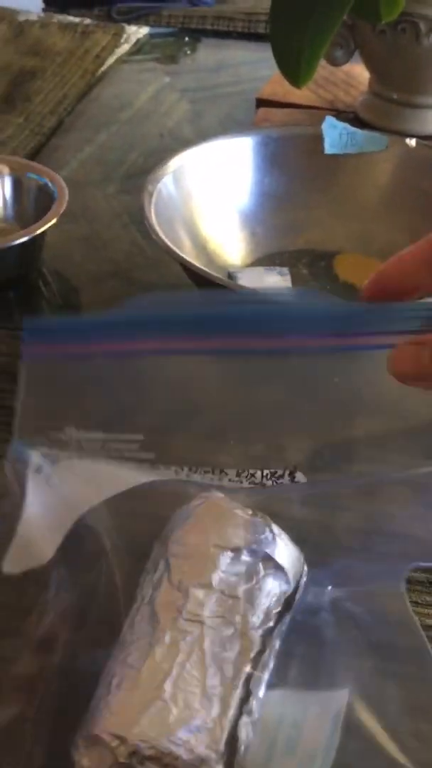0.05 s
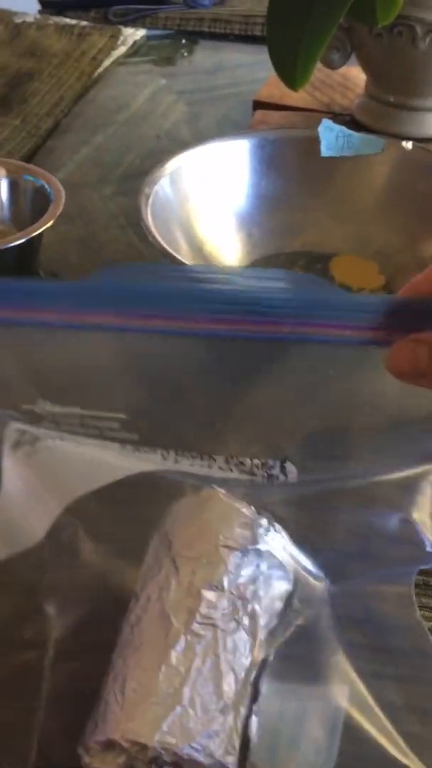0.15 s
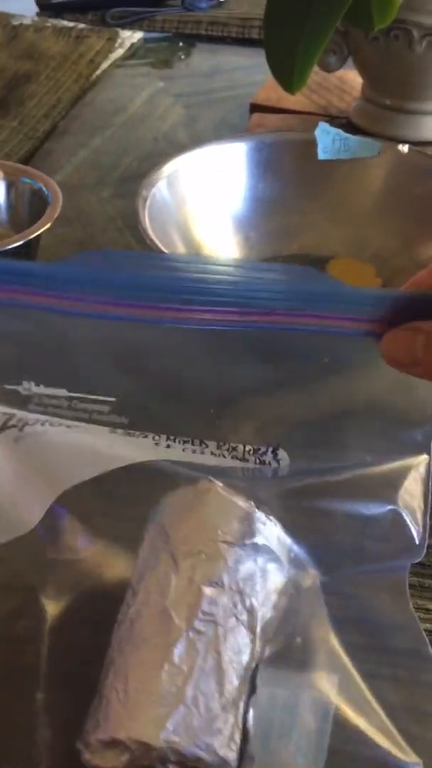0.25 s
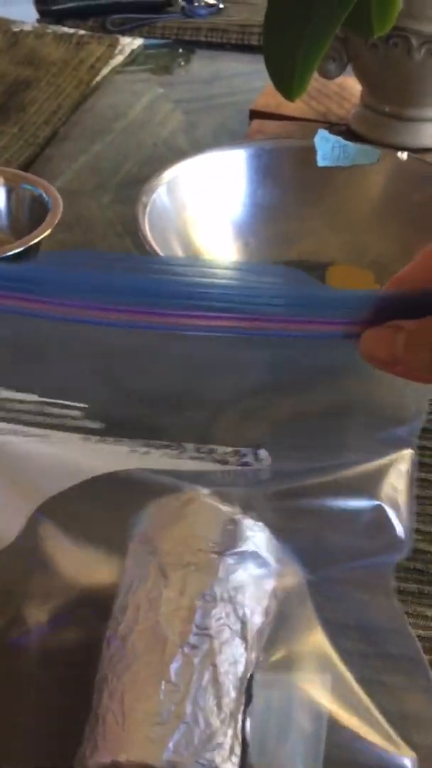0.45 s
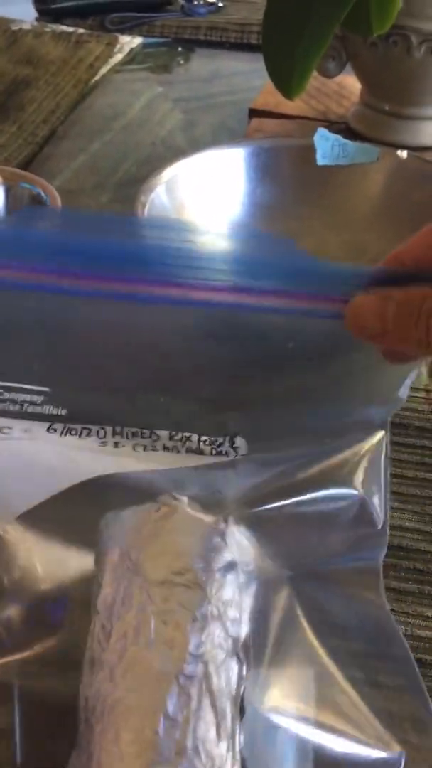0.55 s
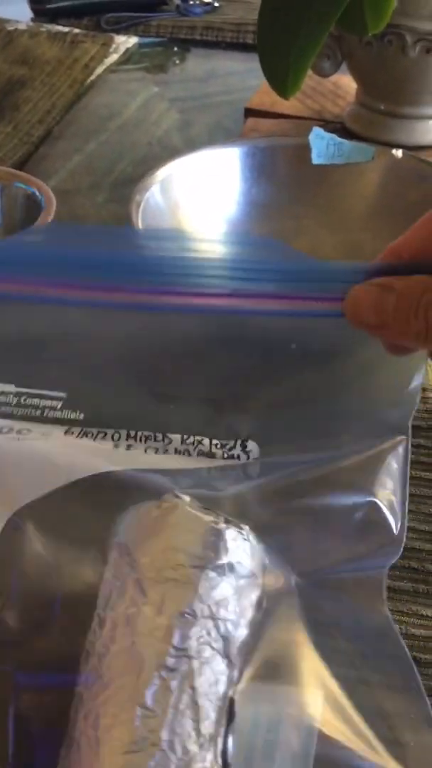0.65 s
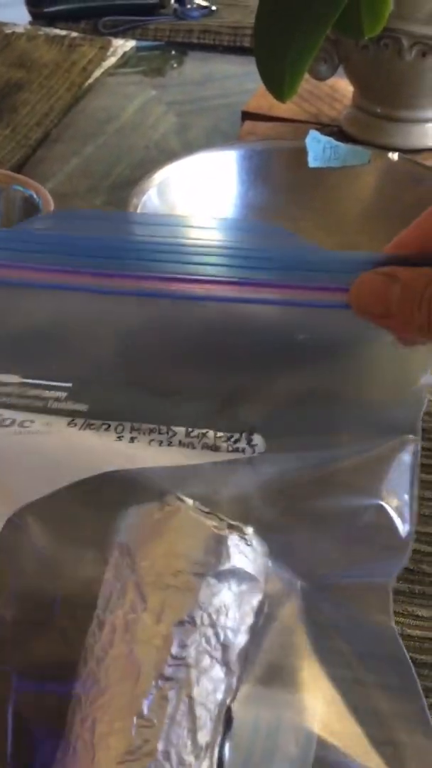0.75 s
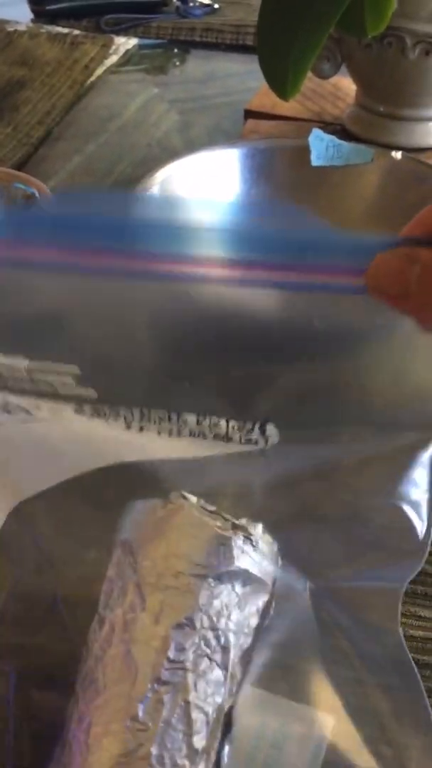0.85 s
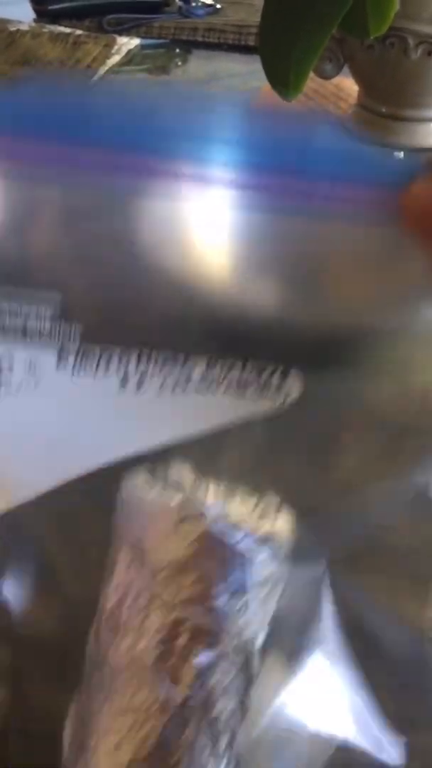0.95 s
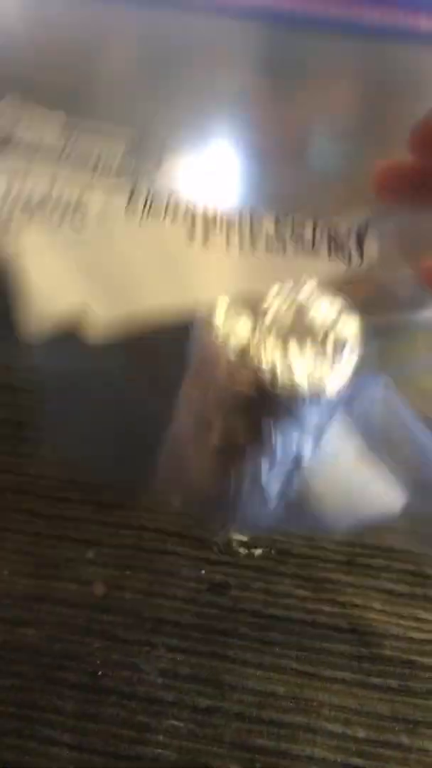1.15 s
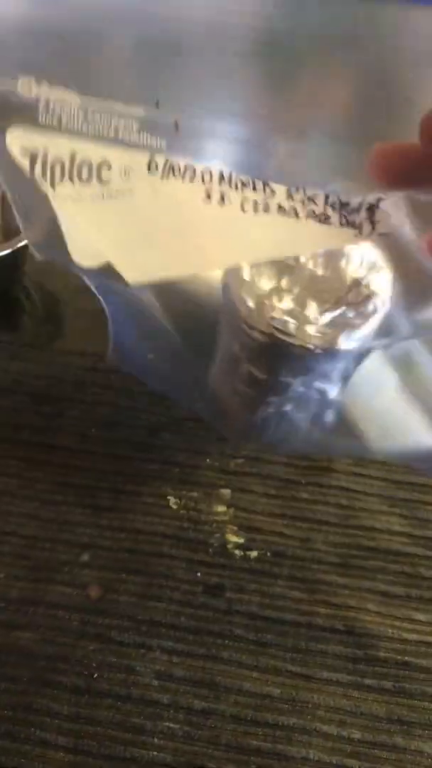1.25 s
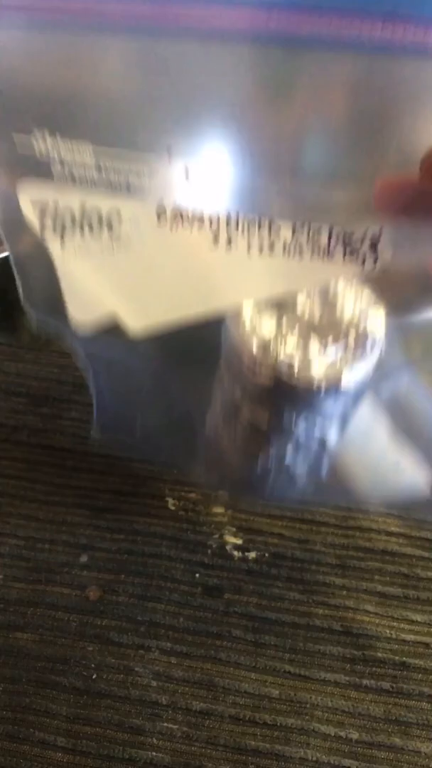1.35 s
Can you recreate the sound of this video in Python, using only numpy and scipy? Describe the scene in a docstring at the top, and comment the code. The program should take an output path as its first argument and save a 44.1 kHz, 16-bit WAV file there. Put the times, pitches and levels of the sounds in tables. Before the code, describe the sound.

A plastic freezer bag crinkles as fingers snap its zip seal shut.

```python
"""Fingers press the zip seal of a plastic freezer bag shut, close by in a small kitchen.
Over a low room hum, the film first ticks as creases flip, bumps softly and rustles with friction.
At about 0.2 s the ridge of the seal snaps into its groove three times, ringing the strip's modes.
Then the bag is shifted and lifted: more ticks, rustles and dull bumps, thickest around one second."""
import sys
import numpy as np
from scipy import signal
from scipy.fft import rfft, irfft, next_fast_len
from scipy.io import wavfile

SR = 44100
rng = np.random.default_rng(int(sys.argv[2]) if len(sys.argv) > 2 else 0)


def unload_audio(sound):
    """Save the sound as a 16-bit wav file, at the path given as the first command line argument."""
    columns = np.transpose(np.atleast_2d(sound))
    # keep every value between -1 and 1, then stretch to whole-number steps
    steps = np.round(np.clip(columns, -1, 1) * 32767)
    wavfile.write(sys.argv[1], SR, steps.astype(np.int16))


N = 61739
T = np.arange(N) / SR

# Spectrum of the room noise. Each row: frequency in Hz, relative level in dB.
ROOM_NOISE_SPECTRUM = [(15, -23.5), (25, -16), (80, -1.5), (108, -12), (149, -5), (212, -7.5), (301, -10),
                       (335, -13), (451, -18.5), (695, -29.5), (1260, -27), (1560, -31), (5280, -38.5),
                       (16000, -49.5)]
# Creases flipping. Each row: start in seconds, level in dB, pitch in Hz, relative edge level in dB.
CREASE_FLIPS = [(0.0045, -20, 1220, -23.5), (0.111, -34, 2220, -5), (0.1691, -25.5, 4070, -21),
                (0.1698, -22.5, 1510, -30), (0.2885, -27.5, 2520, -34), (0.499, -14.5, 1700, -26.5),
                (0.5005, -14.5, 815, -51), (0.5662, -17, 1050, -35), (0.567, -28.5, 2400, -43),
                (0.7333, -38, 1586, -22.5), (0.7933, -19.5, 1296, -33), (0.8374, -24.5, 1260, -37),
                (0.8525, -29, 1900, -31), (0.8721, -22.5, 3380, -20), (0.8723, -19, 1330, -31),
                (0.8955, -18.5, 2960, -37), (0.8995, -13.5, 1370, -21.5), (0.906, -25, 2000, -34),
                (0.9168, -23, 2190, -28), (0.9419, -13, 2150, -27), (0.9599, -28.5, 3000, -1.5),
                (1.0816, -21, 1610, -29), (1.095, -9, 1390, -31), (1.1052, -23.5, 4200, -17.5),
                (1.1141, -15.5, 1600, -30), (1.1433, -19, 1440, -26), (1.1554, -24.5, 4070, -11.5),
                (1.2706, -12, 1400, -44), (1.2703, -22.5, 3120, -26), (1.3006, -20, 1240, -33),
                (1.3306, -30, 5350, -22), (1.3396, -14, 860, -15.5), (1.3853, -15.5, 990, -38.5),
                (1.3849, -24.5, 2700, -19)]
# The bag flexing. Each row: centre in seconds, length in seconds, level in dB, pitch in Hz.
HAND_BUMPS = [(0.005, 0.037, -51.5, 236), (0.898, 0.041, -49, 206), (0.948, 0.02, -45.5, 154),
              (1.128, 0.056, -47.5, 220), (1.108, 0.14, -54, 81), (1.364, 0.056, -52, 213),
              (1.372, 0.064, -51, 54)]
# Spectrum of rubbed film. Each row: frequency in Hz, relative level in dB.
FILM_SPECTRUM = [(150, -27.5), (400, 9), (750, 9), (1700, 0), (3000, -5.5), (6000, -14), (9000, -20),
                 (15500, -29.5)]
# Film sliding over film and fingers. Each row: loudest moment in seconds, 20 dB rise and fall times
# in seconds, level in dB, tilt above the ringing pitch in dB per octave, ringing pitch in Hz.
FILM_SLIDES = [(0.026, 0.063, .05, -43, 1, 994), (0.108, 0.048, 0.035, -51.5, 4.5, 1910),
               (0.5, 0.013, 0.03, -47.5, 5, 820), (0.592, 0.027, 0.041, -63.5, 5.5, 1500),
               (0.906, 0.061, 0.033, -41.5, 3.5, 740), (0.938, 0.0098, 0.038, -42.5, 4, 1020),
               (0.962, 0.019, 0.061, -44.5, 5.5, 1160), (1.03, 0.018, 0.031, -49.5, 3.5, 694),
               (1.076, .006, 0.078, -45.5, -3.5, 5920), (1.099, 0.032, 0.049, -41, 1, 1410),
               (1.159, 0.099, 0.24, -57.5, 3.5, 594), (1.34, 0.0043, 0.012, -35.5, 3, 900),
               (1.364, 0.036, 0.39, -53, 3, 920)]
# The seal closing. Each row: start in seconds, level in dB, lower edge in Hz, emphasised pitch in Hz,
# then the relative levels in dB of that emphasis, of the film's shiver and of the rebound.
SEAL_SNAPS = [(0.2065, -0.5, 750, 1440, -3.5, 0, -14), (0.2325, -5.5, 5300, 8100, 4.5, -2, -34),
              (0.2464, -2.5, 3250, 6400, 6, -5, -33)]
# Modes of the seal strip. Each row: frequency in Hz, bandwidth in Hz, gain in dB.
STRIP_MODES = [(750, 340, -12), (1900, 1150, 3.5), (3000, 380, 4.5), (4200, 1180, 6), (6150, 2100, 0),
               (7250, 3500, -1), (9100, 2050, 8.5), (12170, 1500, 5.5)]
# Spectrum of the reverberation. Each row: frequency in Hz, relative level in dB.
REVERB_SPECTRUM = [(200, 0), (1000, 1), (1900, 0), (2600, 1.5), (4000, -5), (6500, -8), (9000, -5),
                   (15000, -7.5)]
# Notches of the microphone port. Each row: frequency in Hz, bandwidth in Hz, gain at the centre in dB.
PORT_NOTCHES = [(2400, 230, -0.5), (4950, 330, -3), (10360, 370, -11)]


def amp(db):
    """Decibels as an amplitude ratio."""
    return 10 ** (np.asarray(db) / 20)


def rms_one(x):
    """Normalisation to an rms of 1."""
    return x / np.sqrt(np.mean(x ** 2) + 1e-20)


def impulse(s):
    """A unit impulse at s seconds."""
    return (np.arange(N) == max(round(s * SR), 0)) + 1e-18


def cut(x, hz, kind, order=2):
    """Butterworth low- or high-pass filtering."""
    return signal.sosfilt(signal.butter(order, min(hz, SR / 2 - 500), kind, fs=SR, output="sos"), x)


def resonate(x, hz, width_hz):
    """A damped resonator with unit peak gain."""
    r = np.exp(-np.pi * width_hz / SR)
    feedback = [1, -2 * r * np.cos(2 * np.pi * hz / SR), r * r]
    return signal.lfilter(np.array([1, 0, -1]) * (1 - r * r) / 2, feedback, x)


def colour(x, db_at):
    """Spectral shaping by a function from octaves (log2 Hz) to dB."""
    size = next_fast_len(N + SR // 10)
    octaves = np.log2(np.maximum(np.arange(size // 2 + 1) * SR / size, 1))
    return irfft(rfft(x, size) * amp(db_at(octaves)), size)[:N]


def curve(points):
    """Interpolation of (Hz, dB) points as a function of octaves."""
    hz, db = np.transpose(points)
    return lambda octaves: np.interp(octaves, np.log2(hz), db)


def bell(x, centre, width):
    """A Gaussian of height 1."""
    return np.exp(-.5 * ((x - centre) / width) ** 2)


def convolve(x, response):
    """Convolution with an impulse response."""
    return signal.fftconvolve(x, response)[:N]


def dying_noise(t60):
    """Exponential decay: noise of unit energy that falls 60 dB in t60 seconds."""
    tail = rng.standard_normal(N) * np.exp(-np.log(1000) * T / t60)
    return tail / np.linalg.norm(tail)


def flutter(t60):
    """Phase scattering: a brief dense shake with a nearly flat spectrum."""
    spectrum = rfft(dying_noise(t60))
    return irfft(spectrum / (np.abs(spectrum) + 1e-12), N) * (T < t60)


def slips(per_s, spread_db=3):
    """A Poisson process: tiny slips of uneven size at random moments."""
    sizes = amp(spread_db * np.minimum(rng.exponential(1, N), 4.5)) * rng.choice([-1, 1], N)
    return sizes * (rng.random(N) < per_s / SR)


def room_hum(noise_db=-54, hum_db=-59.5, hum_hz=76.5):
    """Superposition of steady broadband room noise and the pure tone of an appliance."""
    air = rms_one(colour(rng.standard_normal(N), curve(ROOM_NOISE_SPECTRUM)))
    hum = np.sqrt(2) * np.sin(2 * np.pi * hum_hz * T)
    return amp(noise_db) * air + amp(hum_db) * hum


def creases(shiver_db=9.5, pop_q=2.27):
    """Buckling: each crease flips with a crisp edge and a damped pop, and the film shivers briefly."""
    out = 0
    for start, db, hz, edge_db in CREASE_FLIPS:
        flip = amp(db) * impulse(start)
        shaken = flip + amp(shiver_db) * convolve(flip, flutter(t60=0.01))
        pop = cut(resonate(shaken, hz, hz / pop_q), 1.89 * hz, "low")
        edge = amp(edge_db) * cut(shaken, 13000, "low")
        out = out + pop + edge
    return cut(out, 483, "high")


def bumps(relative_bandwidth=0.56):
    """Heavily damped resonance: the whole bag flexes in the hand with a dull swell of low noise."""
    out = 0
    for centre, length, db, hz in HAND_BUMPS:
        flex = resonate(rng.standard_normal(N), hz, hz * relative_bandwidth)
        out = out + amp(db) * bell(T, centre, length / 2) * rms_one(cut(flex, 2 * hz, "low"))
    return out


def rustle(crackle_db=-67, ring_db=5.5, ring_octaves=0.17, bass_loss_db_per_octave=5):
    """Stick-slip friction: each slide is a swell of tiny slips, coloured by the panel that moves."""
    film = curve(FILM_SPECTRUM)
    out = amp(crackle_db) * rms_one(colour(slips(per_s=770), film))  # held film crackles throughout
    for peak, rise, fall, db, tilt_db, hz in FILM_SLIDES:
        def panel(octaves):
            """Panel resonance: a peak on the film's spectrum, with a slope on either side."""
            above = octaves - np.log2(hz)
            slopes = tilt_db * np.maximum(above, 0) - bass_loss_db_per_octave * np.maximum(-above, 0)
            return film(octaves) + slopes + ring_db * bell(above, 0, ring_octaves)

        swell = amp(db - 20 * np.maximum((peak - T) / rise, (T - peak) / fall))
        friction = colour(slips(per_s=5000), panel)
        out = out + swell * rms_one(cut(friction, 220, "high"))
    return out


def seal_snaps(rebound_s=0.00053, thud_db=-18.5):
    """Modal ringing: the ridge drops into its groove and rebounds; a shorter stretch sounds higher."""
    out = 0
    for start, db, edge_hz, emphasis_hz, emphasis_db, shiver_db, rebound_db in SEAL_SNAPS:
        push = amp(db) * (impulse(start) + amp(rebound_db) * impulse(start + rebound_s))
        modes = sum(amp(mode_db) * resonate(push, hz, width) for hz, width, mode_db in STRIP_MODES)
        strip = cut(modes, edge_hz, "high", order=3)
        strip = strip + amp(emphasis_db) * resonate(strip, emphasis_hz, width_hz=1680)
        shiver = cut(convolve(push, flutter(t60=0.01)), 5100, "low", order=1)  # film around the seal
        body = cut(amp(shiver_db) * shiver + amp(thud_db) * push, 580, "high", order=3)
        out = out + strip + body
    return cut(out, 12800, "low")


def kitchen(x, scatter_db=-21.5, echo_db=-22.5, echo_s=0.0072, tail_db=-16, tail_delay_s=0.0098):
    """Reflection: the direct sound is followed by bag scatter, a counter echo and reverberation."""
    tail = colour(dying_noise(t60=0.33), curve(REVERB_SPECTRUM)) * (T > tail_delay_s)
    echo = convolve(impulse(echo_s), flutter(t60=0.035))
    scatter = flutter(t60=0.023)
    return x + convolve(x, amp(scatter_db) * scatter + amp(echo_db) * echo + amp(tail_db) * tail)


def scene():
    """Superposition in mono: the plastic with its reflections, the bumps and the room hum."""
    plastic = seal_snaps() + creases() + rustle()
    return (kitchen(plastic) + bumps() + room_hum())[None]


def record(dry, ceiling=0.8, cutoff_hz=15900):
    """Filtering and saturation: the microphone port cuts notches, peaks round off, the top is cut."""
    for hz, width, db in PORT_NOTCHES:
        dry = dry + (amp(db) - 1) * resonate(dry, hz, width)
    rounded = ceiling * np.tanh(dry / ceiling)
    return signal.sosfilt(signal.ellip(10, .1, 70, cutoff_hz, fs=SR, output="sos"), rounded)


dry = scene()
out = record(dry)
unload_audio(out)
```